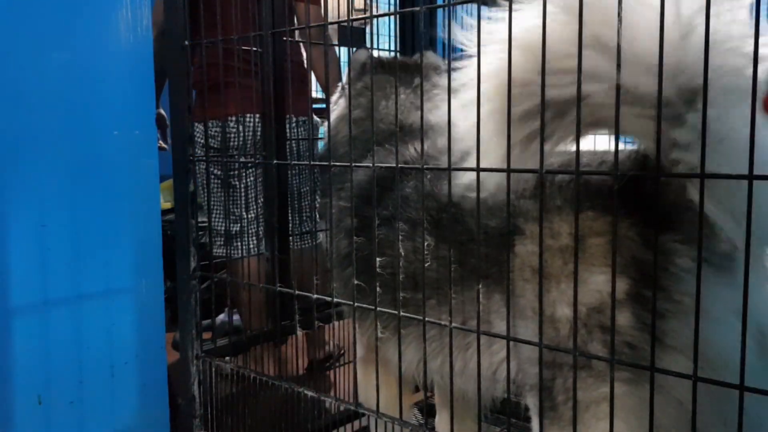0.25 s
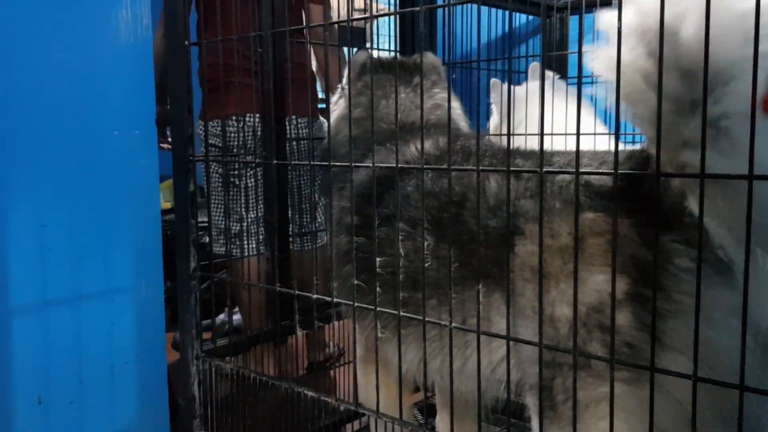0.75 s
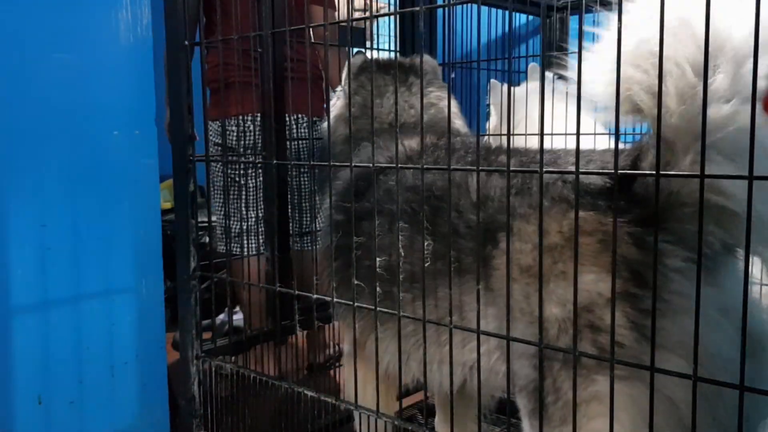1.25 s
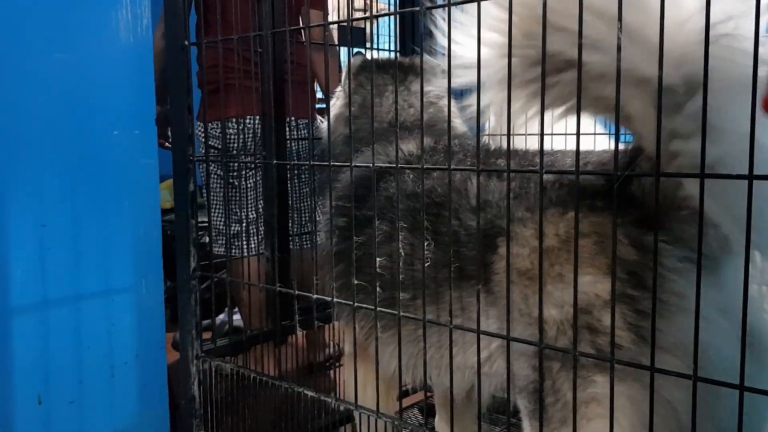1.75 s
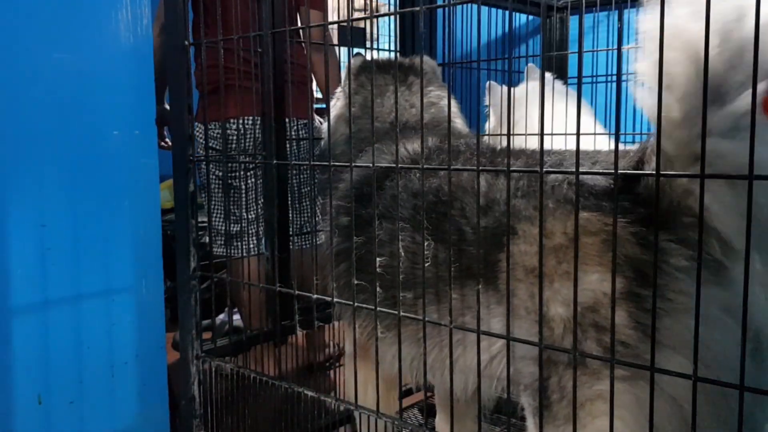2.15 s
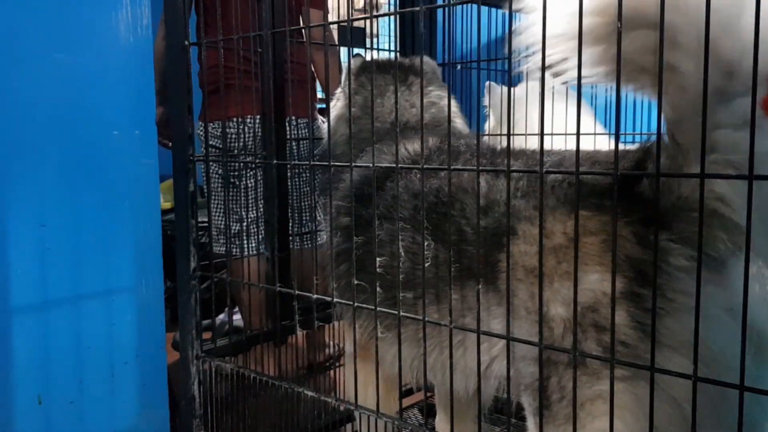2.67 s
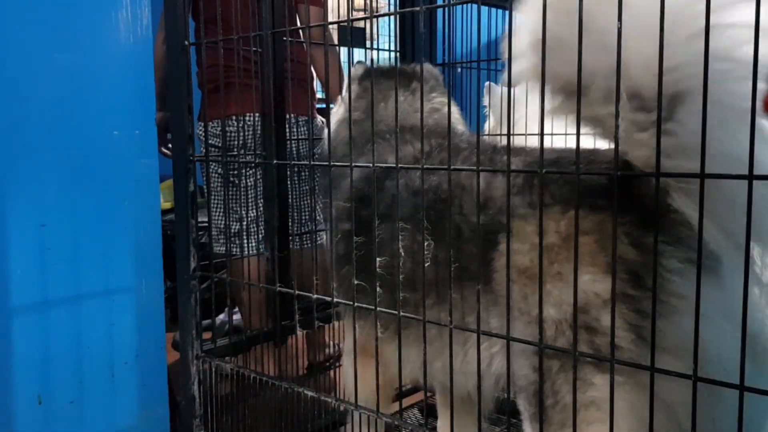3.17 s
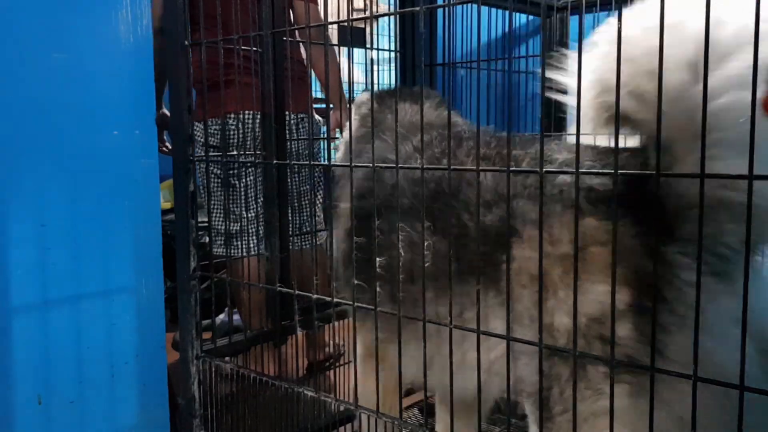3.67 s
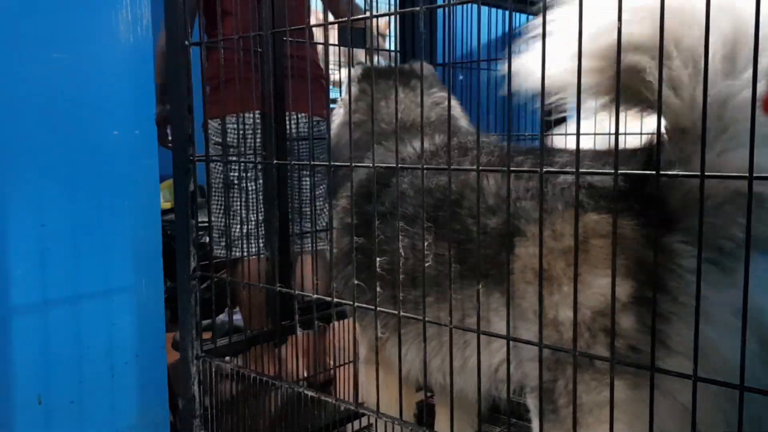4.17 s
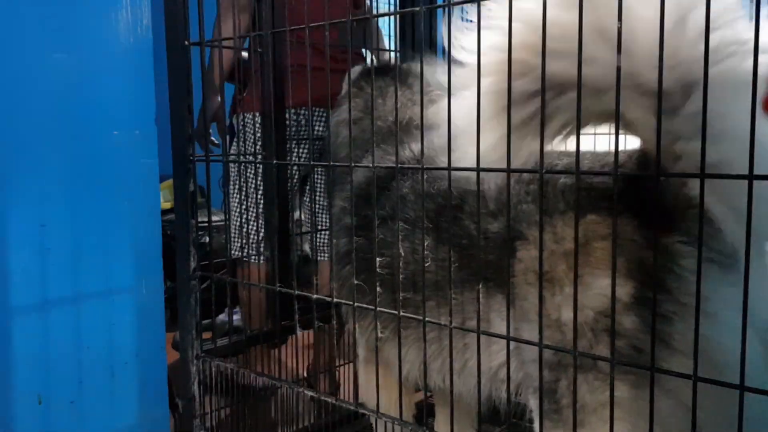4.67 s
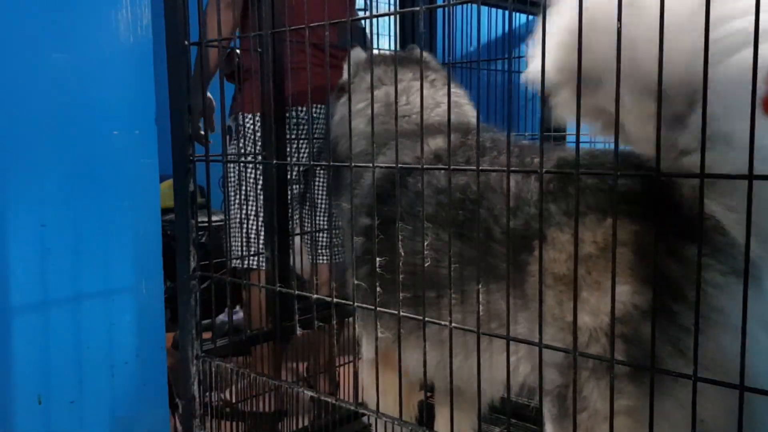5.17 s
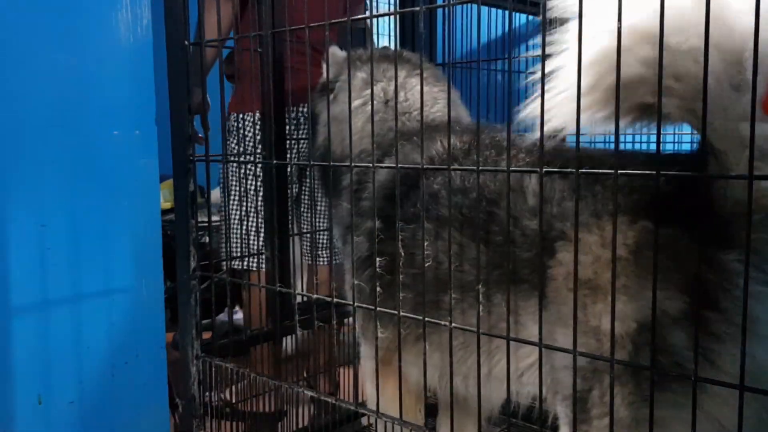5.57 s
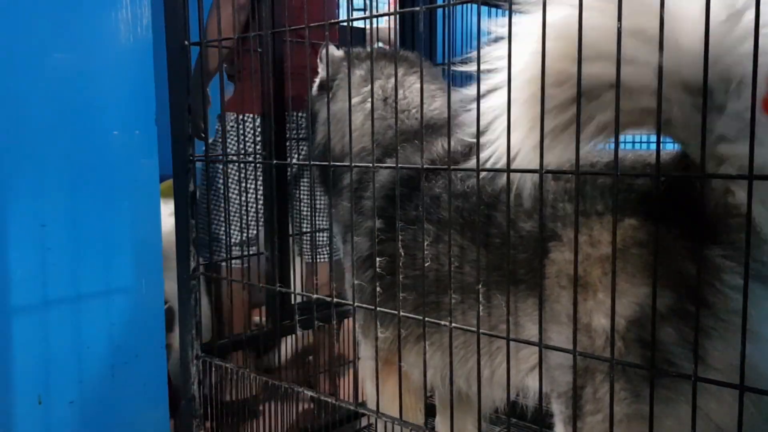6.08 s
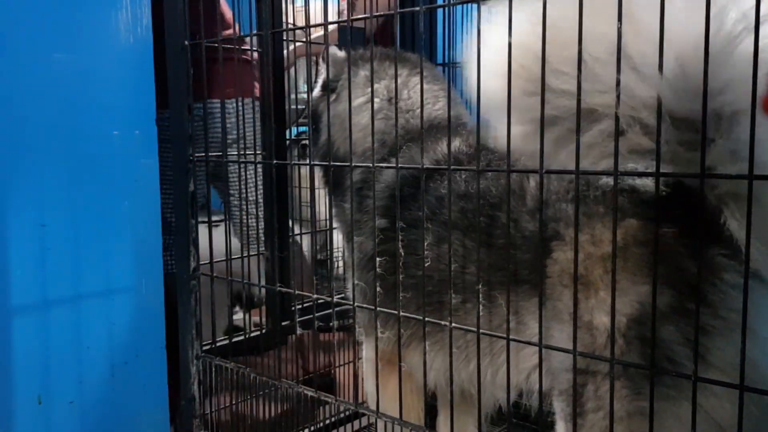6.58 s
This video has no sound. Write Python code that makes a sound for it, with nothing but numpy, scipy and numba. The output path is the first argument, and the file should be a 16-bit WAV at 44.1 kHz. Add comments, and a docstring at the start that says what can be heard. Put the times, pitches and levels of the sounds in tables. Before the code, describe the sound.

A reverberant, hard-walled kennel room in stereo, with soft air and a faint wavering low hum. From 0 to 0.5 s a dog gives three quick hoarse woofs, already in mid-run at the start. A louder one lands at 0.8 s with a low distant whine, and a thin high whistling whine trails to 1.2 s. Five woofs follow evenly from 1.25 to 2.3 s, the last weaker, then three strong ones at 2.6, 2.8 and 3.1 s. At 3.5 s a loud shrill yelp breaks into raspy surges, with a clear squeal peaking near 3.9 s. Single yaps, falling in pitch, come at 4.35, 4.8, 5.3 and 5.75 s, the last higher and brighter. A barely audible whimper slips in at 5.1 s and a soft rising one at 6.5 s. Small wire ticks and scratches are scattered throughout, clearer after 3.4 s, and the echo fades to near quiet.

```python
"""A dog woofs in quick runs in a hard-walled kennel room, picked up by a spaced pair of microphone ports.
A long yelp breaks into a squeal; single yaps, whimpers and thin whines follow or mingle with them.
Each bark is a hoarse arch of pitch shaped by throat and mouth, mostly heard through the room's echo.
Wire crates give sharp ticks, noise grains behind a snap, and a low hum and soft air lie underneath."""
import sys
import numpy as np
from scipy import signal
from scipy.fft import rfft, irfft, next_fast_len
from scipy.io import wavfile
from scipy.ndimage import uniform_filter1d
from numba import njit

SR = 44100
rng = np.random.default_rng(int(sys.argv[2]) if len(sys.argv) > 2 else 0)


def digitize_waveform(pressure):
    """Quantize a signal to 16-bit integers and store it at the path in sys.argv[1].

    Rows of a 2-D input are taken as channels; values are limited to [-1, 1].
    """
    field = np.atleast_2d(pressure).T
    bounded = np.clip(field, -1, 1)
    quanta = np.round(bounded * 32767).astype(np.int16)
    wavfile.write(sys.argv[1], SR, quanta)


N = 301192


def from_db(db):
    """Amplitude ratio of a level in dB."""
    return 10 ** (np.asarray(db) / 20)


def rms_one(x):
    """Scale to an rms of 1."""
    return x / np.sqrt(np.mean(x ** 2) + 1e-20)


def at_hz(points, hz):
    """Read a table of (frequency, value) along a logarithmic frequency axis."""
    table_hz, values = np.transpose(points)
    return np.interp(np.log(hz + 1), np.log(table_hz), values)


def colour(x, db_at):
    """Causal (minimum-phase) filter whose gain in dB is a function of frequency."""
    size = 2 * next_fast_len(x.shape[-1] // 2 + 2048)
    gain = from_db(db_at(np.fft.rfftfreq(size, 1 / SR)))
    cepstrum = irfft(np.log(gain))
    # folding the cepstrum onto positive time gives minimum phase
    cepstrum[1:size // 2] *= 2
    cepstrum[size // 2 + 1:] = 0
    response = np.exp(rfft(cepstrum))
    return irfft(rfft(x, size) * response)[..., :x.shape[-1]]


def drift(size, rate_hz):
    """Random wavering up to the given rate; spread 1."""
    r = np.exp(-2 * np.pi * rate_hz / SR)
    noise = rng.standard_normal(size + SR // 10)  # the extra 0.1 s lets the filter settle
    return rms_one(signal.lfilter([1], [1, -2 * r, r * r], noise)[-size:])


def add(out, sound, start_s):
    """Mix a sound in at its start time, cut to the length of the scene."""
    at = round(start_s * SR)
    part = sound[:, max(-at, 0):N - at]
    out[:, max(at, 0):max(at, 0) + part.shape[1]] += part


def panned(x, right_db):
    """Shift a stereo sound towards the right port."""
    return x * from_db([[-right_db / 2], [right_db / 2]])


PORT_GAP_M, PORT_MATCH = 0.15, 0.98
SOUND_SPEED_M_PER_S = 343


def diffuse(size):
    """Noise from all directions at two microphone ports: alike in the bass, unrelated in the treble."""
    hz = np.fft.rfftfreq(size, 1 / SR)
    alike = PORT_MATCH * np.sinc(2 * hz * PORT_GAP_M / SOUND_SPEED_M_PER_S)
    mid, side = rfft(rng.standard_normal((2, size)))
    return irfft(np.sqrt(1 + alike) * mid + np.sqrt(1 - alike) * side * [[1], [-1]], size)


# how long the hard-walled room rings: (frequency [Hz], time to fall by 60 dB [s])
ROOM_RING = [(250, 0.57), (700, 0.49), (1500, 0.48), (5000, 0.58), (12000, 0.46)]
RIGHT_LAG = 8  # samples by which the direct sound reaches the right port later


def in_room(dry, level_db, direct_db, build_s=0.0025):
    """A direct path and a dense tail with its own ring in each band; the loudest 40 ms has the given level."""
    t, hz = np.arange(SR) / SR, np.fft.rfftfreq(SR, 1 / SR)
    field, tail = rfft(diffuse(SR)), 0
    centres, t60s = np.transpose(ROOM_RING)
    for share, t60 in zip(np.eye(len(centres)), t60s):
        band_gain = np.interp(np.log(hz + 1), np.log(centres), share)
        band = irfft(field * band_gain, SR)
        tail = tail + band * np.exp(-np.log(1000) * t / t60)
    response = rms_one(tail * (1 - np.exp(-t / build_s))) / np.sqrt(SR)
    response[[0, 1], [0, RIGHT_LAG]] += from_db(direct_db)  # direct level relative to the tail
    wet = signal.fftconvolve(dry[None], response, axes=1)
    power = uniform_filter1d(np.mean(wet, axis=0) ** 2, SR // 25)
    return wet * from_db(level_db) / np.sqrt(power.max())


@njit
def moving_resonance(x, angle, radius):
    """Two-pole resonance, gain 1 on top, whose centre (radians per sample) glides."""
    y = np.zeros(len(x))
    for i in range(2, len(x)):
        drive = (1 - radius ** 2) / 2 * (x[i] - x[i - 2])
        y[i] = drive + 2 * radius * np.cos(angle[i]) * y[i - 1] - radius ** 2 * y[i - 2]
    return y


def folds(pitch, tones_db, jitter, jitter_hz):
    """Vocal folds: a harmonic stack on an unsteady pitch; also returns the phase."""
    unsteady = pitch * (1 + jitter * drift(len(pitch), jitter_hz))
    phase = 2 * np.pi * np.cumsum(unsteady) / SR
    voice = 0
    for k, db in enumerate(tones_db, 1):
        audible = k * pitch < SR / 2
        voice = voice + from_db(db) * np.cos(k * phase) * audible
    return voice, phase


# throat and head of a barking dog, under its moving mouth and its own throat resonance:
# (frequency [Hz], gain [dB])
THROAT_AND_HEAD = [(150, -28.5), (300, -31), (410, -5.5), (600, -6), (850, -6), (1300, -1.5), (1700, -3.5),
                   (2200, -9), (2700, -6), (3200, -21.5), (3800, -35), (5500, -46), (9000, -39),
                   (15000, -59)]


def bark(length, top_hz, rasp_db, bright_db, throat_hz,
         rise_share, start_ratio, end_ratio, onset_db, shrill_db, clear_db,
         jitter=0.04963, flutter=0.69, breath=1.34, mouth_db=10, mouth_width_hz=150,
         throat_db=6, end_db=-19, closing_db=-9, easing_db=-6, jaw_drop=0.25):
    """One push of air: an arch of pitch whose rasp differs at the start, the top and the end."""
    t = np.arange(int(length * SR)) / SR
    rise = length * rise_share
    before = np.clip(1 - t / rise, 0, 1) ** 1.6  # 1 at the start, 0 from the top of the push on
    after = np.clip((t - rise) / (length - rise), 0, 1) ** 1.454  # 0 up to the top, 1 at the end
    pitch = top_hz * (1 + (start_ratio - 1) * before + (end_ratio - 1) * after)
    rasp = from_db(rasp_db + clear_db * before + easing_db * after)

    tones_db = -3 * np.log2(np.arange(1, 17))
    voice, phase = folds(pitch, tones_db, jitter * rasp, jitter_hz=145.6)
    # uneven strong and weak cycles fill in between the harmonics
    voice = voice * (1 + flutter * (np.cos(phase / 2) + rasp * drift(len(t), 220)))
    turbulence = rng.standard_normal(len(t)) * (1 + 0.91 * np.cos(phase))
    source = rms_one(voice) + breath * rasp * turbulence

    # the mouth resonance rides on the fundamental, then sinks and takes over as the jaw closes
    mouth_hz = pitch * (1 - jaw_drop * after)
    mouth = moving_resonance(source, 2 * np.pi * mouth_hz / SR, np.exp(-np.pi * mouth_width_hz / SR))
    mouth_gain = from_db(mouth_db * (1 - 0.62 * before))
    source = mouth_gain * mouth + source * from_db(closing_db * after)
    push = from_db(onset_db * before + end_db * after) * signal.windows.tukey(len(t), .06)

    def tract_db(hz):
        throat = throat_db * np.exp(-(np.log2((hz + 1) / throat_hz) / 0.13) ** 2)
        shrill = at_hz([(2900, 0.0049), (4000, shrill_db), (5400, 0.93 * shrill_db), (7500, 0.0098)], hz)
        bright = at_hz([(750, 0.0073), (1300, bright_db)], hz)
        return at_hz(THROAT_AND_HEAD, hz) + throat + shrill + bright

    return colour(source * push, tract_db)


# a rested dog starts its woof more softly and swings its pitch further than one in mid-run
RECOVERY_S, RESTED_ONSET_DB = 0.0988, -20
# pitch drops as shares of the top pitch; the rested ones come on top
START_DROP, RESTED_START_DROP, END_DROP, RESTED_END_DROP = .2, .15, 0.038, 0.203
WOOF_SHAPE = dict(
    rise_share=.53, shrill_db=1.5, mouth_db=11, mouth_width_hz=137, end_db=-18.5,
    easing_db=-6.5, jaw_drop=0.19, clear_db=-2, flutter=.7, jitter=0.04956)
# deep woofs in runs, level at the ports before panning: (start [s], length [s], level [dB],
# top pitch [Hz], rasp [dB], brightness [dB], throat resonance [Hz])
WOOF_RUNS = [(-.13, 0.16, -34, 608.3, 3, 3.5, 1300), (.095, 0.17, -33.5, 600.2, 2.5, 1, 1530),
             (.38, .14, -33.5, 588.5, 6.5, 0, 1250), (.79, .14, -26.5, 640, -1.5, 0, 1240),
             (1.261, 0.18, -27, 655, 4, 1, 1240), (1.482, .19, -27, 617, 0.5, 0, 1070),
             (1.708, 0.19, -28, 631, -4.5, 0, 1060), (1.928, 0.2, -28, 631.2, -2.5, -3, 1090),
             (2.155, .135, -31.5, 607.2, 2, -1, 1290), (2.577, .168, -26.5, 631, 2.5, 3.5, 1280),
             (2.83, .16, -27, 600, 0.5, 2, 1330), (3.068, 0.19, -27.5, 613, 1.5, 2.5, 1270)]


def woofs():
    """Runs of woofs; the pause before each sets onset and arch. The dog moves, so each has its own echoes."""
    out, last_end = np.zeros((2, N)), -np.inf
    for start, length, db, *voicing in WOOF_RUNS:
        rested = 1 - np.exp(-max(start - last_end, 0) / RECOVERY_S)
        dry = bark(length, *voicing, **WOOF_SHAPE,
                   onset_db=RESTED_ONSET_DB * rested,
                   start_ratio=1 - START_DROP - RESTED_START_DROP * rested,
                   end_ratio=1 - END_DROP - RESTED_END_DROP * rested)
        add(out, in_room(dry, db, direct_db=-4.5), start)
        last_end = start + length
    return panned(out, right_db=0.9)


YELP_SHAPE = dict(
    rise_share=0.394, start_ratio=.88, end_ratio=.99, flutter=0.56, end_db=-14,
    clear_db=-1.5, jaw_drop=0.44, jitter=0.041, breath=1.0)
YELP_ONSET_DB, SURGE_ONSET_DB = -18, 3  # from silence; from the surge before
YELP_SHRILL_DB, SHRILL_FADE_DB_PER_S = 23, 40  # the yelp starts shrill and mellows
# hoarse surges of the long yelp, level at the ports before panning: (start [s], length [s], level [dB],
# top pitch [Hz], rasp [dB], brightness [dB], throat resonance [Hz])
YELP_SURGES = [(3.503, 0.1104, -23.5, 878, -12.5, -1.5, 1890), (3.535, 0.17, -31, 882.6, 5.5, 5.5, 2030),
               (3.722, 0.1063, -31, 831.6, 6.5, 2, 1290), (3.835, .1, -37.5, 890, 2, -4, 1240),
               (3.9, 0.131, -46, 620.5, 6.5, 3, 1170)]


def yelp():
    """A clear shrill cry that breaks into rasp, surge upon surge of air."""
    out, first = np.zeros((2, N)), YELP_SURGES[0][0]
    for start, length, db, *voicing in YELP_SURGES:
        dry = bark(length, *voicing, **YELP_SHAPE,
                   onset_db=YELP_ONSET_DB if start == first else SURGE_ONSET_DB,
                   shrill_db=YELP_SHRILL_DB - SHRILL_FADE_DB_PER_S * (start - first))
        add(out, in_room(dry, db, direct_db=-4), start)
    return panned(out, right_db=0.4)


YAP_SHAPE = dict(
    rise_share=.42, start_ratio=1.13, onset_db=-12, shrill_db=6, end_db=-10.5, clear_db=-13,
    flutter=0.57, jaw_drop=0.13, throat_db=5.5, mouth_width_hz=130, easing_db=-5)
# single yaps that fall in pitch, level at the ports before panning: (start [s], length [s], level [dB],
# top pitch [Hz], rasp [dB], brightness [dB], throat resonance [Hz], end pitch [Hz])
SINGLE_YAPS = [(4.356, .13, -31.8, 713.5, -2, 6, 1256, 642), (4.827, 0.11, -35, 650.8, 3.5, 2.5, 1233, 426),
               (5.272, .175, -33.5, 688.6, 2.5, 6, 1273, 559.5), (5.744, .185, -30, 820.8, 1, 4, 3020, 747)]


def yaps():
    """Single barks, each one push of air with a falling pitch."""
    out = np.zeros((2, N))
    for start, length, db, top_hz, *voicing, end_hz in SINGLE_YAPS:
        dry = bark(length, top_hz, *voicing, end_ratio=end_hz / top_hz, **YAP_SHAPE)
        add(out, in_room(dry, db, direct_db=-7.5), start)
    return panned(out, right_db=1.6)


WHIMPER_SHAPE = dict(
    rise_share=0.45, start_ratio=.75, end_ratio=1.2, onset_db=2.5, shrill_db=16.5,
    flutter=0.27, end_db=-9, clear_db=-1)
# soft rising whimpers, level at the ports before panning: (start [s], length [s], level [dB],
# top pitch [Hz], rasp [dB], brightness [dB], throat resonance [Hz])
SOFT_WHIMPERS = [(5.11, 0.0916, -56.5, 493, 1, -4, 1090), (6.468, .13, -44, 561.4, -17, 11.5, 1090)]


def whimpers():
    """Soft weak pushes of air whose pitch rises to the end."""
    out = np.zeros((2, N))
    for start, length, db, *voicing in SOFT_WHIMPERS:
        dry = bark(length, *voicing, **WHIMPER_SHAPE)
        add(out, in_room(dry, db, direct_db=-6), start)
    return panned(out, right_db=1.6)


def cry(rows, tones_db, jitter, direct_db):
    """A nearly pure gliding tone from tight vocal folds; its highest table level sets its loudest 40 ms."""
    s, hz, db = np.transpose(rows)
    t = np.arange(s[0], s[-1], 1 / SR)
    voice, _ = folds(np.interp(t, s, hz), tones_db, jitter, jitter_hz=65)
    dry = voice * from_db(np.interp(t, s, db)) * signal.windows.tukey(len(t), .1)
    out = np.zeros((2, N))
    add(out, in_room(dry, db.max(), direct_db), s[0])
    return out


# paths of the thin cries, levels giving the contour of each: (time [s], pitch [Hz], level [dB])
YIP_PATH = [(3.63, 1216, -35.5), (3.67, 1329, -40), (3.70, 1404, -35.5), (3.73, 1358, -40),
            (3.77, 1258, -46)]
SQUEAL_PATH = [(3.82, 1231, -54), (3.855, 1280, -35), (3.892, 1454, -30.5), (3.93, 1474, -27.5),
               (3.972, 1455, -28), (3.99, 1449, -37.5), (4.03, 1428, -38.5)]
WHINE_PATH = [(.65, 713, -64), (.69, 734.5, -51), (.74, 745, -56), (.77, 682, -45.5), (.81, 647, -47.5)]
PEEP_PATH = [(3.78, 6610, -71), (3.81, 6450, -62), (3.85, 6380, -67), (3.88, 6350, -72)]
# a whistling whine in two strands, the higher taking over from the lower: (time [s], pitch [Hz], level [dB])
LOW_STRAND = [(.85, 4150, -69), (.9, 4320, -63), (.95, 4454, -59), (.99, 4564, -58), (1.1, 4550, -66),
              (1.17, 4535, -77)]
HIGH_STRAND = [(.96, 4740, -65), (1.005, 5010, -61), (1.054, 5030, -61), (1.089, 5290, -67),
               (1.13, 5280, -63), (1.22, 5320, -67), (1.26, 5260, -85)]
# harmonics of each cry, from the fundamental up: (relative level [dB])
YIP_HARMONICS = [-5, -8, -27, -28]
SQUEAL_HARMONICS = [0, -19.5, -33.5, -34.5]
WHINE_HARMONICS = [2, -1.5, -1, -17]
WHISTLE_HARMONICS = [0, -6.5, -13]


def cries():
    """Whines and squeals of tight folds, from a low moan up to a thin whistle and peep."""
    yip = cry(YIP_PATH, YIP_HARMONICS, jitter=0.0157, direct_db=-4.5)
    squeal = cry(SQUEAL_PATH, SQUEAL_HARMONICS, jitter=0.0107, direct_db=6)
    low = cry(LOW_STRAND, WHISTLE_HARMONICS, jitter=.009, direct_db=-4.5)
    high = cry(HIGH_STRAND, WHISTLE_HARMONICS, jitter=.009, direct_db=-4.5)
    whine = cry(WHINE_PATH, WHINE_HARMONICS, jitter=0.019, direct_db=-17.5)  # far: almost all echo
    peep = cry(PEEP_PATH, [0], jitter=.008, direct_db=-6)
    return panned(yip + squeal, right_db=2.5) + low + high + whine + peep


SNAP_DB, SNAP_S = 2.5, .002  # the first contact of each tick, over the scratch that follows
# ticks from the crates: (start [s], level [dB], scratch decay [s], body below 3 kHz [dB])
CRATE_TICKS = [(0.479, -65.5, 0.036, -13), (0.644, -64, 0.07, -2), (1.503, -67, .02, -6),
               (2.165, -56.5, 0.055, 9), (2.844, -68, 0.024, -2), (2.99, -62, .04, -2.5),
               (3.386, -61, 0.26, -1), (3.556, -55, 0.12, -.5), (4.032, -53.5, 0.14, -4.5),
               (4.448, -56, 0.08, -6), (4.698, -59, 0.15, -4), (4.966, -51, .009, -8),
               (5.083, -58, 0.12, 1.5), (5.331, -63, .019, -5), (5.494, -58, .004, -2.5),
               (6.157, -60, 0.054, -1), (6.514, -59, 0.0096, 1), (6.705, -66, 0.011, 7)]
# sound of wire on wire, before each tick's body: (frequency [Hz], gain [dB])
WIRE_COLOUR = [(100, -12), (250, 13.5), (400, -2.5), (1500, 11.5), (3000, 6.5), (6000, 4), (9000, 0),
               (12000, 2), (15500, -8.5)]


def ticks():
    """A snap and a short bright scratch of contact, drawn out by the room."""
    out, t = np.zeros((2, N)), np.arange(SR // 5) / SR
    for start, db, decay, body_db in CRATE_TICKS:
        contact = np.exp(-t / decay) + from_db(SNAP_DB) * np.exp(-t / SNAP_S)
        grains = rng.standard_normal(len(t)) ** 3 * contact  # cubing makes the noise sparse and spiky

        def wire_db(hz):
            return at_hz(WIRE_COLOUR, hz) + at_hz([(3000, body_db), (9000, 0.013)], hz)

        add(out, in_room(colour(grains, wire_db), db, direct_db=-18.5), start)
    return out


HUM_HZ, HUM_SHARE_DB = 97, -5.5  # hum level relative to the rumble noise
RUMBLE_DB, SWELL_S = -71, 0.11  # steady level; time from the top of a swell to 1/e
# brief swells, joining the steady level by power: (time of the top [s], level [dB])
RUMBLE_SWELLS = [(2.72, -69), (3.42, -61), (4.13, -74), (6.7, -68)]
# spectrum shape of the low rumble: (frequency [Hz], relative level per Hz [dB])
RUMBLE_SPECTRUM = [(25, -20), (45, -14), (60, -3), (75, -1), (85, -4), (105, 1), (135, -15), (250, -24.5),
                   (600, -48)]


def rumble():
    """Low noise with a wavering hum in it that swells now and then."""
    noise = rms_one(colour(diffuse(N), lambda hz: at_hz(RUMBLE_SPECTRUM, hz)))
    hum_hz = HUM_HZ * (1 + .025 * drift(N, 7.8))
    hum = np.sin(2 * np.pi * np.cumsum(hum_hz) / SR) * (1 + 0.63 * drift(N, 4.3))
    t = np.arange(N) / SR
    swells = sum(from_db(db) * np.exp(-((t - s) / SWELL_S) ** 2) for s, db in RUMBLE_SWELLS)
    level = np.hypot(from_db(RUMBLE_DB), swells)
    return level * rms_one(noise + from_db(HUM_SHARE_DB) * rms_one(hum))


AIR_DB = -65
# spectrum shape of the room air: (frequency [Hz], relative level per Hz [dB])
AIR_SPECTRUM = [(25, -17.5), (135, -14), (250, -1), (350, -9.5), (600, -9.5), (1500, -12), (3000, -19),
                (6000, -22.5), (15000, -32)]


def room_air():
    """Soft steady noise reaching the ports from all directions."""
    return from_db(AIR_DB) * rms_one(colour(diffuse(N), lambda hz: at_hz(AIR_SPECTRUM, hz)))


def scene():
    """The dogs, their crates and the room."""
    dogs = woofs() + yelp() + yaps() + whimpers() + cries()
    return dogs + ticks() + rumble() + room_air()


CUTOFF_HZ = 15700


def record(dry):
    """A steep low-pass cuts the top of the treble."""
    low_pass = signal.ellip(10, .1, 80, CUTOFF_HZ, fs=SR, output="sos")
    return signal.sosfilt(low_pass, dry)


dry = scene()
out = record(dry)
digitize_waveform(out)
```